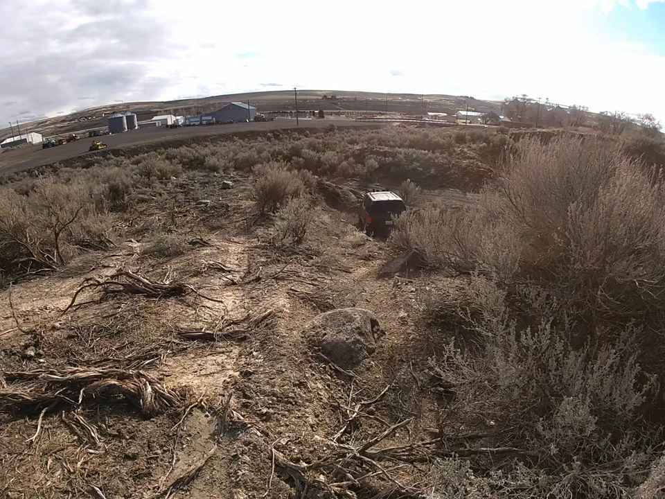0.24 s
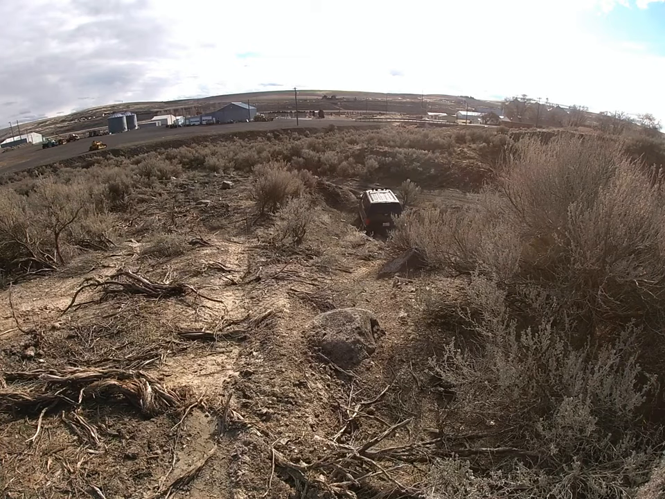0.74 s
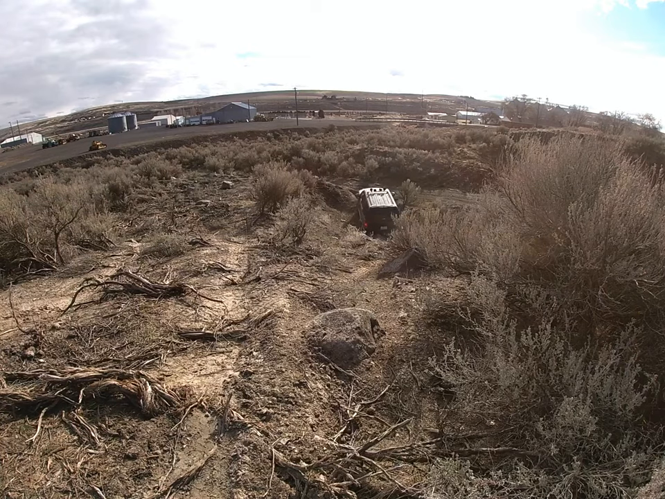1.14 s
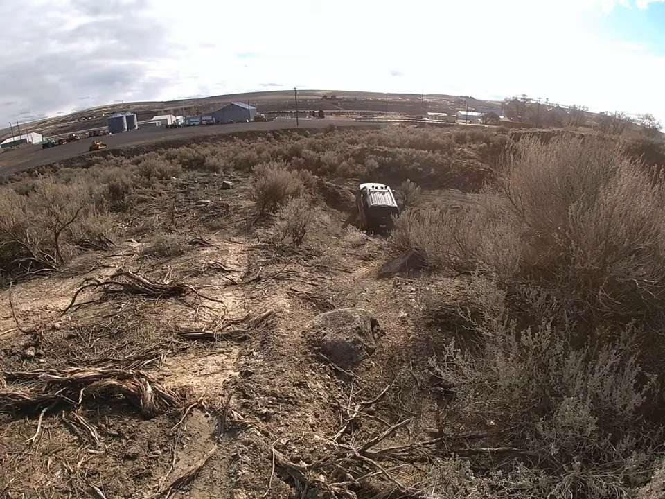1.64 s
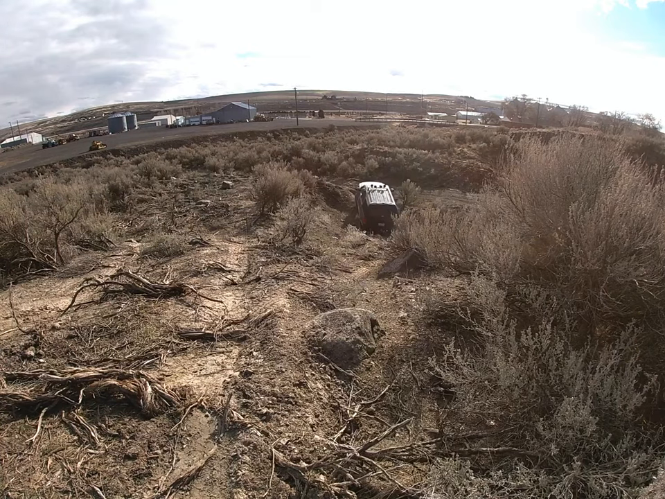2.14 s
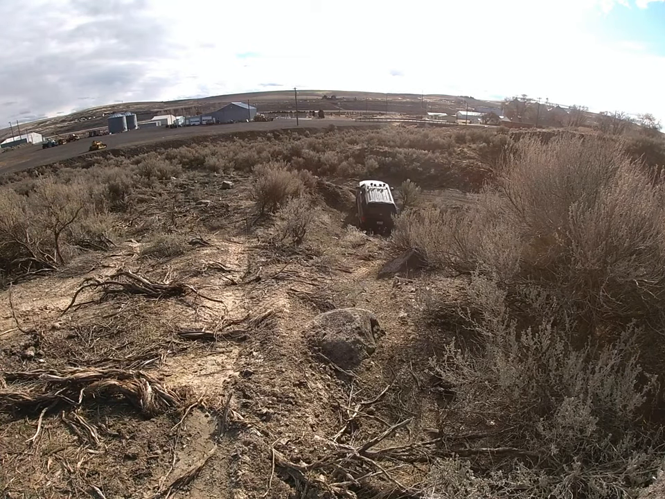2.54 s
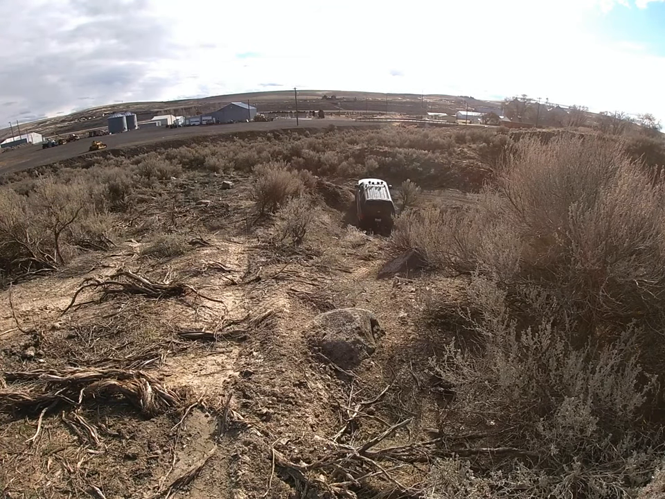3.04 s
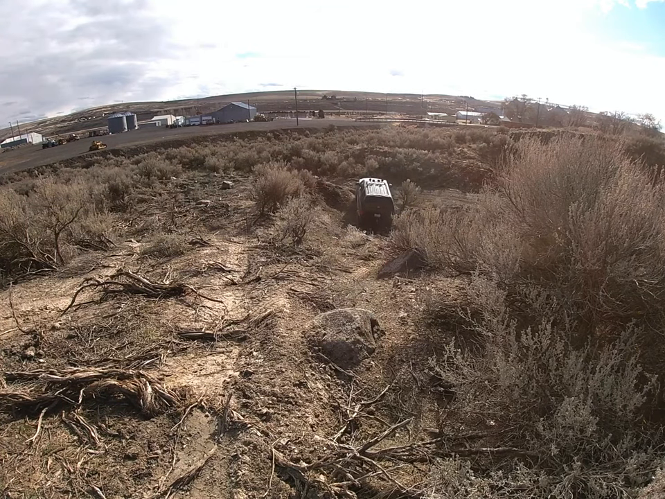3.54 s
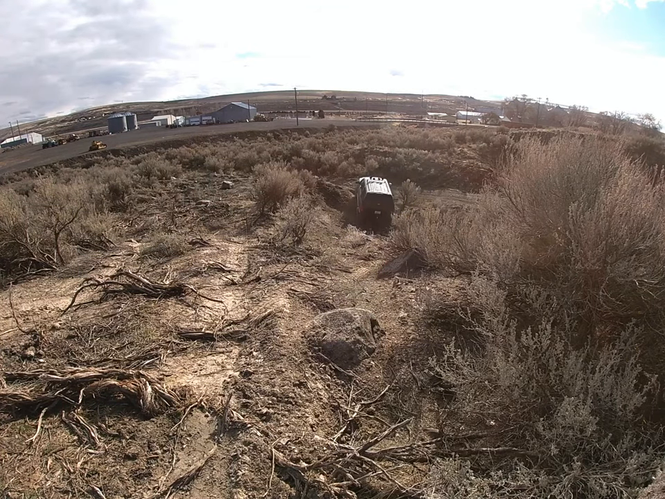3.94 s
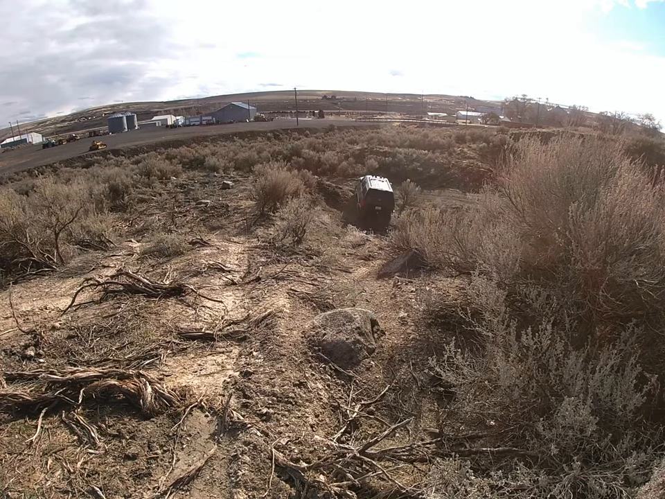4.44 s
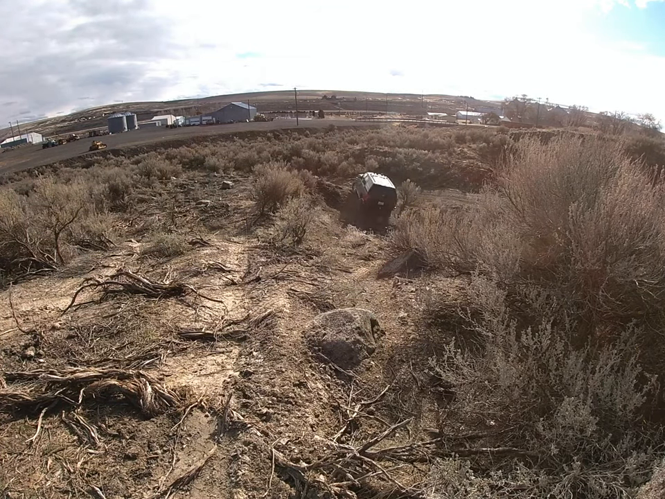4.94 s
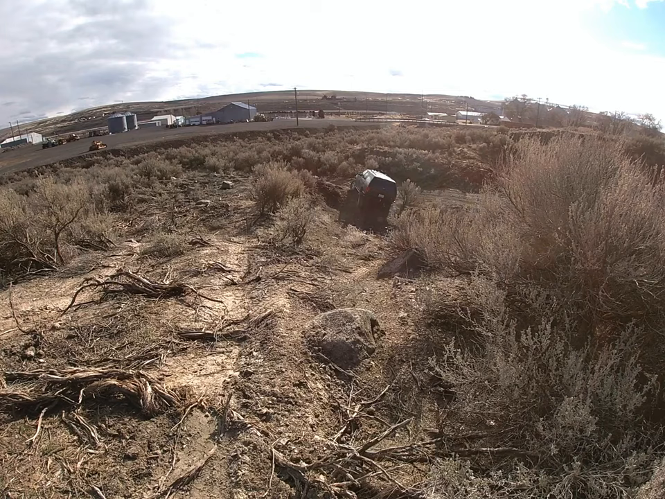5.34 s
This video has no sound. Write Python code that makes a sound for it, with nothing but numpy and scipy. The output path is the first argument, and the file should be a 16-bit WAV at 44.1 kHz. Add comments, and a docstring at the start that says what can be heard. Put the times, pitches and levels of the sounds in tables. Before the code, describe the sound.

A V8 off-roader crawls up a dirt gully in open scrub, heard from some way off with no echo. Its exhaust booms and lopes over a low rumble. On a first dab of throttle, tyres faintly crunch grit and twigs snap. Low thumps follow, like wind on the microphone, then two more dabs with a faint whine and small squeaks. It ends on a longer, steady pull at higher revs.

```python
"""A V8 off-roader crawls up a dirt gully in open scrub, some way off. From the start its exhaust booms
and lopes over a low rumble, with a faint high ticking throughout. On a first dab of throttle the tyres
crunch grit, dry brush scrapes, twigs snap and something squeaks. Low thumps and muffled buffets follow,
like wind on the microphone, and the drivetrain whines faintly through two more dabs. Last comes a long
steady pull, the engine bay opening up as the truck noses out of the gully."""
import sys
import numpy as np
from scipy import signal
from scipy.fft import rfft, irfft, next_fast_len
from scipy.io import wavfile
from scipy.ndimage import uniform_filter1d, map_coordinates

SR = 44100
rng = np.random.default_rng(int(sys.argv[2]) if len(sys.argv) > 2 else 0)


def generate_wav(signal):
    """Clip the signal to [-1, 1] and save it as 16-bit WAV at the path in sys.argv[1]."""
    frames = np.transpose(np.atleast_2d(signal))
    scaled = np.clip(frames, -1, 1) * 32767
    pcm = np.round(scaled).astype(np.int16)
    wavfile.write(sys.argv[1], SR, pcm)


N = 246078
FIRINGS = 8  # per engine cycle


def amp(db):
    """Decibels to gain."""
    return 10 ** (np.asarray(db) / 20)


def unit(x):
    """Scale to rms 1."""
    return x / np.sqrt(np.mean(x ** 2) + 1e-20)


def eq_gain(points, hz):
    """Gain at hz of an EQ curve drawn through (Hz, dB) points on a log axis."""
    point_hz, db = np.transpose(points)
    return amp(np.interp(np.log(hz + 1), np.log(point_hz + 1), db))


def automation(rows):
    """One value per sample, in straight ramps between (seconds, value) rows."""
    times, values = np.transpose(rows)
    return np.interp(np.arange(N) / SR, times, values)


def wobble(rate):
    """A smooth random curve, rate knots a second."""
    knots = rng.standard_normal(int(N * rate / SR) + 4)
    return map_coordinates(knots, [np.arange(N) * rate / SR])


def swells(rows, steady_db):
    """Gain of a steady bed with bell-shaped swells, from (centre s, half length s, dB) rows."""
    t = np.arange(N) / SR
    power = sum(amp(db) ** 2 * np.exp(-((t - s) / half) ** 2) for s, half, db in rows)
    return np.sqrt(amp(steady_db) ** 2 + power)


def filtered(x, response):
    """Filter x by a gain given as a function of Hz."""
    size = next_fast_len(len(x) + 8192)
    return irfft(rfft(x, size) * response(np.fft.rfftfreq(size, 1 / SR)), size)[:len(x)]


def coloured(x, eq):
    """x through an EQ curve, at rms 1."""
    return unit(filtered(x, lambda hz: eq_gain(eq, hz)))


def patchy(x, depth_db):
    """Let each narrow band of x swell and fade on its own."""
    bands = signal.stft(x, nperseg=1024)[2]
    drift = uniform_filter1d(rng.standard_normal(bands.shape), size=3, axis=0)
    drift = uniform_filter1d(drift, size=7, axis=1)
    return unit(signal.istft(bands * amp(depth_db * unit(drift)), nperseg=1024)[1][:len(x)])


def crackle(grains_per_s, spread_db, hiss, low_hz=700, top_hz=11500, grain_t60=0.003):
    """Dense tiny cracks of uneven size, each ringing briefly at its own pitch, on a soft hiss."""
    when, pitch, size = rng.random((int(grains_per_s * N / SR), 3)).T[:, :, None]
    n = np.arange(int(grain_t60 * SR))
    gains = amp(spread_db * np.minimum(-np.log(1 - size), 4))  # many small, a few large
    hz = low_hz + (top_hz - low_hz) * pitch
    grains = gains * amp(-60 * n / len(n)) * np.sin(2 * np.pi * hz * n / SR)
    positions = (when * N).astype(int) + n
    cracks = np.bincount(positions.ravel(), grains.ravel(), N)[:N]
    return unit(cracks) + hiss * rng.standard_normal(N)


def add(track, s, sound):
    """Mix a sound into the track from s seconds on."""
    part = track[max(round(s * SR), 0):][:len(sound)]
    part += sound[:len(part)]


def loping_tone(order, cycle, far_gain=0.6, far_late_cycles=0.05, weak_gain=0.5):
    """One exhaust harmonic, phased by banks taking unequal turns, a longer pipe and a weak cylinder."""
    far_bank = np.array([0, 1, 1, 0, 1, 0, 0, 1])  # firings that take the longer pipe
    pulses = np.where(far_bank, far_gain, 1.0)
    pulses[0] *= weak_gain
    arrivals = np.arange(FIRINGS) / FIRINGS + far_late_cycles * far_bank
    phase = np.angle(np.sum(pulses * np.exp(-2j * np.pi * order * arrivals)))
    return -np.sqrt(2) * np.cos(2 * np.pi * order * cycle + phase)


def exhaust(cycle, cycle_hz, boom_db=-0.2, weak_db=-2.3, weak_load=0.43, low_rev_db=-3, settle_hz=24):
    """Harmonics swell as the revs carry them across the pipe's resonances, and throb once a cycle."""
    # The strong harmonics, as multiples of the engine cycle.
    strong_orders = [5, 8, 11, 13, 16]
    # Their boom in the pipe. Each row: firings per second, then relative levels in dB for the
    # low lope, the firing note, the middle lope, the high lope and the firing octave.
    boom = [(51.8, -57.5, -42.5, -51, -27.5, -28), (57.9, -45.5, -34.5, -31, -40, -25),
            (59, -42, -32.5, -34.5, -43.5, -25.5), (67.6, -32.5, -30, -45.5, -47, -25),
            (72.56, -31, -23, -38, -59, -26), (76.3, -27.5, -19.5, -35, -38, -31),
            (83.9, -28, -21, -29.5, -25.5, -36), (90.8, -26.5, -21, -29, -27, -44)]
    # Weak harmonics from unequal cylinders. Each row: multiple of the cycle, relative level in dB.
    weak_orders = [(6, -41.5), (7, -27.5), (9, -43), (10, -34.5), (12, -35.5), (14, -30.5), (15, -42.5),
                   (17, -41.5), (18, -34.5), (19, -39.5), (20, -35.5), (21, -41), (22, -38.5), (23, -43.5),
                   (24, -37.5), (25, -43)]
    # Silencer and tailpipe EQ. Each row: frequency in Hz, gain in dB.
    pipe_eq = [(30, -13), (62, -10), (80, -2), (100, -4), (120, -10), (143, -3), (160, -4), (190, -12),
               (215, -10.5), (229, -8.5), (242, -30), (400, -31.5)]
    # Load drops at lift-off and jumps at the pick-up. Each row: time in seconds, gain in dB.
    load = [(0, 2.5), (.35, -3), (.75, -6.5), (1.15, -2.5), (1.33, -12.5), (1.97, -10), (2.03, 3.5),
            (2.5, -2.5), (2.92, 2), (3.3, -4.5), (3.72, 0.5), (4.3, 0.5), (5.58, -1.5)]
    load_db = automation(load)
    firing_hz = FIRINGS * cycle_hz
    # Combustion is uneven at low revs and settles as the engine speeds up.
    unsettled = np.exp((firing_hz.min() - firing_hz) / settle_hz)
    waver_db, rough_db, burble_db = 1.0, 2.5, 2.0
    speeds, *levels = np.transpose(boom)
    out = np.zeros(N)
    for order, db in zip(strong_orders, levels):
        level_db = np.interp(firing_hz, speeds, db) + load_db + boom_db
        out += amp(level_db + waver_db * unsettled * wobble(14)) * loping_tone(order, cycle)
    for order, db in weak_orders:
        level_db = db + weak_db + weak_load * load_db
        stumble_db = unsettled * (low_rev_db + rough_db * wobble(11))
        out += amp(level_db + stumble_db) * eq_gain(pipe_eq, order * cycle_hz) * loping_tone(order, cycle)
    return amp(burble_db * unsettled * wobble(20)) * out


def rasp(cycle, cycle_hz, rasp_db=-64, db_per_hz=2, octave_db=-9, rough_db=3, jitter_turns=0.085):
    """Rough high engine harmonics, fading by the octave and growing with the revs."""
    orders = np.arange(33, 54)
    out = np.zeros(N)
    for order in orders:
        turns = order * cycle + rng.random() + jitter_turns * wobble(12)
        level_db = octave_db * np.log2(order / orders[0]) + rough_db * rng.standard_normal()
        out += amp(level_db) * np.sin(2 * np.pi * turns)
    return amp(rasp_db + db_per_hz * (cycle_hz - cycle_hz.max())) * out


def engine_bay(cycle, cycle_hz, bay_db=-57.0, db_per_hz=0.84, throb_depth=0.12):
    """Fan and valve noise, louder with the revs and throbbing with each firing."""
    # A broad midrange rush. Each row: frequency in Hz, relative level in dB.
    bay_eq = [(300, -4.5), (550, 1), (800, 2), (1030, -1), (1300, 1), (1550, 0.5), (1800, -2), (2200, -5),
              (3000, -11), (4500, -21), (8500, -30), (10500, -47.5), (12000, -62)]
    # The bay opens up as the truck leaves the gully. Each row: time in seconds, gain in dB.
    opening = [(4.65, -5.5), (4.95, -2.5), (5.38, -1.5), (5.58, -3.5)]
    throb = 1 + throb_depth * np.cos(2 * np.pi * FIRINGS * cycle)
    rush = patchy(rng.standard_normal(N), depth_db=2.0)
    level_db = bay_db + db_per_hz * (cycle_hz - cycle_hz.mean()) + automation(opening)
    return amp(level_db) * coloured(throb * rush, bay_eq)


def rumble(roll_db=-35, shake_db=-55, lumps_db=0.5):
    """Low rumble and the body's shudder; both swell as the truck lurches over rough ground."""
    # Each row: centre in seconds, half length in seconds, rumble in dB, shudder in dB.
    lurches = [(0.306, 0.16, -37, -51), (0.677, 0.064, -28.5, -56), (1.44, 0.52, -37, -57.5),
               (1.814, 0.088, -25.5, -50.5), (2.24, 0.11, -27, -51.5), (2.622, 0.03, -29, -48.5),
               (2.784, 0.1, -34.5, -49), (3.046, 0.13, -30.5, -58), (3.255, 0.077, -24, -57),
               (3.83, 0.12, -29, -53), (5.498, 0.16, -45, -49.5)]
    # Deep rumble, low-mid shudder. Each row: frequency in Hz, relative level in dB.
    rumble_eq = [(10, -9), (24, 11.5), (40, 11.5), (62, 8), (85, 13.5), (120, 13), (165, 8), (205, 2.5),
                 (250, -12), (450, -64.5), (2000, -120)]
    shudder_eq = [(90, -15.5), (170, -3), (230, 2), (285, 4.5), (330, -1.5), (400, -10), (520, -14),
                  (700, -25), (1100, -37), (2500, -68.5), (6000, -120)]
    roll = swells([(s, half, db) for s, half, db, _ in lurches], roll_db)
    shake = swells([(s, half, db) for s, half, _, db in lurches], shake_db)
    low = coloured(rng.standard_normal(N), rumble_eq)
    lumps = amp(lumps_db * wobble(60))
    shudder = coloured(lumps * rng.standard_normal(N), shudder_eq)
    return roll * low + shake * shudder


def still_air(air_db=-67):
    """The steady hush of still air over the scrub."""
    # Each row: frequency in Hz, relative level in dB.
    air_eq = [(200, 4.5), (400, 2.5), (780, 8.5), (1100, -7), (2000, -10.5), (3800, -18), (7000, -18.5),
              (9800, -32), (12000, -54)]
    return amp(air_db) * coloured(rng.standard_normal(N), air_eq)


def ticking(tick_db=-69.0, per_s=27.0, scatter_s=0.0035, centre_hz=7400, sweep_hz=400, width_s=0.0014):
    """Faint, slightly fuzzy rising chirps, high up, at a nearly even pace."""
    out, t = np.zeros(N), np.arange(-SR // 200, SR // 200) / SR
    envelope = np.exp(-0.5 * (t / width_s) ** 2)
    for i, (late, size, pitch) in enumerate(rng.standard_normal((int(N / SR * per_s), 3))):
        hz = centre_hz * (1 + 0.025 * pitch) + sweep_hz * t / width_s
        fuzz = np.cumsum(0.34 * uniform_filter1d(rng.standard_normal(len(t)), size=12))
        chirp = envelope * np.sin(2 * np.pi * np.cumsum(hz) / SR + fuzz)
        add(out, i / per_s + scatter_s * late, amp(tick_db + 2 * size) * chirp)
    return out


def tyre_crunch(stones_db=-81.0, gravel_db=-79.5):
    """Tyres grind coarse stones and fine gravel, louder where they bite into a patch of grit."""
    # Each row: centre in seconds, half length in seconds, stones in dB, gravel in dB.
    patches = [(.12, 0.14, -76, -79), (1.02, .14, -69.5, -76), (1.09, 0.013, -65, -68),
               (1.15, .034, -64.5, -66.5), (1.37, 0.057, -76, -72.5), (2.42, 0.096, -73, -73.5),
               (2.68, 0.13, -72, -73.5), (2.89, 0.064, -71, -67.5), (3.02, 0.078, -68, -71),
               (3.22, 0.12, -75.5, -77.5), (4.07, 0.08, -74, -84), (4.32, .036, -67, -76.5),
               (4.82, .06, -64, -66.5), (4.925, 0.018, -62, -66.5), (5.0, 0.053, -67.5, -70),
               (5.275, 0.019, -65, -68.5), (5.4, 0.1, -67.5, -74.5)]
    # Darker stones, brighter gravel. Each row: frequency in Hz, relative level in dB.
    stones_eq = [(600, -16.5), (1800, 2.5), (3000, 6.5), (4200, -3), (6000, -15.5), (9000, -26.5),
                 (12500, -49.5)]
    gravel_eq = [(1500, -23.5), (3000, -10), (4200, 0), (5300, -1), (7000, -4), (8200, -10.5), (9500, -10),
                 (10500, -27), (12500, -47.5)]
    stones = coloured(crackle(grains_per_s=3000, spread_db=3.0, hiss=0.75), stones_eq)
    gravel = coloured(crackle(grains_per_s=3500, spread_db=3.0, hiss=0.75), gravel_eq)
    stones *= swells([(s, half, db) for s, half, db, _ in patches], stones_db)
    gravel *= swells([(s, half, db) for s, half, _, db in patches], gravel_db)
    return stones + gravel


def brush_scrape(rustle_db=-91):
    """Dry stems sweep along the body with a fine, bright scrape."""
    # Each row: centre in seconds, half length in seconds, level in dB.
    sweeps = [(.2, 0.07, -80), (.92, 0.099, -72.5), (1.11, 0.098, -72), (1.27, 0.027, -74.5),
              (3.11, 0.011, -73), (3.345, 0.019, -70), (4.84, 0.087, -74.5), (5.07, 0.011, -71)]
    # The bristly top end. Each row: frequency in Hz, relative level in dB.
    stems_eq = [(3000, -24.5), (6000, -5), (7400, 0.5), (8200, -9.5), (9000, 2), (9800, 0.5),
                (10600, -12.5), (12500, -21.5)]
    stems = coloured(crackle(grains_per_s=3000, spread_db=3.7, hiss=0.55), stems_eq)
    return swells(sweeps, rustle_db) * stems


def snaps(tail_t60=0.031):
    """Each snap is one crack with a brief splintering tail: thin twigs bright, stones dull."""
    # Each row: start in seconds, peak in dB, low cut in Hz, high cut in Hz, tail in dB re the crack.
    breaks = [(0.158, -51, 3000, 7100, -22), (0.99, -48, 3500, 9600, -18), (1.086, -44, 1800, 9500, -21),
              (1.132, -46, 4000, 12400, -18), (1.142, -46, 3000, 9000, -15),
              (1.155, -43, 2500, 9000, -18.5), (1.264, -48, 4000, 10000, -21),
              (1.362, -52, 3030, 6070, -17), (2.5067, -37.5, 4500, 8700, -29),
              (2.616, -51, 2500, 6000, -20), (2.777, -49.5, 1210, 4000, -18.5),
              (3.092, -46, 4500, 10000, -23), (3.188, -47, 4450, 8100, -25), (3.215, -44, 1500, 4600, -23),
              (3.328, -50, 4500, 10100, -26), (3.3537, -40, 4400, 6500, -34),
              (3.360, -35.5, 4400, 6900, -30), (3.364, -46.5, 990, 2980, -14),
              (4.087, -46, 2540, 5500, -21), (4.733, -48, 1800, 8000, -15), (4.822, -52, 2500, 6500, -4),
              (4.842, -48, 3000, 9000, -6), (4.908, -46, 2000, 5960, 0), (4.943, -47.5, 2000, 4960, -5.5),
              (5.074, -52.5, 5030, 10000, -19.5), (5.392, -36.5, 900, 3900, -22.5)]
    out, t = np.zeros(N), np.arange(SR // 16) / SR
    lead = SR // 200  # room for the filter to ring ahead of the crack
    for s, db, low_hz, top_hz, tail_db in breaks:
        burst = (t == 0) + amp(tail_db - 60 * t / tail_t60) * rng.standard_normal(len(t))
        band = lambda hz: 1 / (1 + (low_hz / (hz + 1)) ** 5) / (1 + (hz / top_hz) ** 8)
        crack = filtered(np.pad(burst, (lead, 0)), band)
        add(out, s - lead / SR, amp(db) * crack / np.abs(crack).max())
    return out


def squeaks():
    """Brief wavering squeaks as something rubs."""
    # Each row: centre in seconds, peak in dB, pitch in Hz, width in seconds, waver as a share of pitch.
    rubs = [(0.24, -69, 4950, 0.0096, .06), (0.238, -78, 2610, .0096, 0.055),
            (1.70, -71, 5080, 0.012, 0.05), (1.70, -71, 2800, 0.012, .06),
            (2.08, -63.5, 1700, 0.013, 0.021), (2.64, -61, 1620, 0.013, 0.024),
            (2.78, -63, 1590, .012, 0.032), (3.016, -61, 1458, 0.014, .012),
            (3.24, -61.5, 1460, 0.011, 0.024), (3.884, -62, 1167, 0.022, 0.019),
            (4.306, -68, 5160, 0.0064, 0.0088), (4.31, -55.5, 3120, 0.0064, 0.0092)]
    out, t = np.zeros(N), np.arange(N) / SR
    for s, db, hz, width, waver in rubs:
        turns = np.cumsum(hz * (1 + waver * wobble(500))) / SR
        envelope = np.exp(-0.5 * ((t - s) / width) ** 2)
        out += amp(db) * envelope * np.sin(2 * np.pi * turns)
    return out


def muffled_buffets(rise_s=0.0022, low_hz=210):
    """Flurries of gruff, muffled knocks, like wind gusts on the microphone."""
    # Each row: start in seconds, peak in dB, high cut in Hz, seconds to die away by 60 dB.
    buffets = [(1.652, -37.5, 340, .035), (1.699, -39, 400, 0.025), (1.723, -35, 280, 0.083),
               (1.746, -25.5, 300, 0.027), (1.761, -39, 330, .05), (1.812, -34, 320, 0.033),
               (1.826, -30.5, 470, 0.068), (1.863, -39, 360, 0.11), (2.173, -39, 440, .06),
               (2.248, -34, 400, .055), (2.28, -37, 400, .045), (2.343, -36, 280, .06),
               (2.465, -43, 290, 0.055), (2.586, -42, 460, 0.023), (2.601, -36.5, 340, 0.058),
               (2.702, -36.5, 390, .035), (2.732, -34.5, 420, 0.1), (2.791, -44, 500, 0.027),
               (2.815, -33.5, 290, 0.038), (2.843, -38, 450, 0.043), (2.862, -34.5, 290, 0.034),
               (5.393, -38, 320, 0.019)]
    out, t = np.zeros(N), np.arange(SR // 6) / SR
    for s, db, top_hz, t60 in buffets:
        band = lambda hz: 1 / (1 + (low_hz / (hz + 1)) ** 4) / (1 + (hz / top_hz) ** 6) / (1 + hz / low_hz)
        envelope = amp(-60 * t / t60) * (1 - np.exp(-t / rise_s))
        knock = envelope * filtered(rng.standard_normal(len(t)), band)
        add(out, s, amp(db) * knock / np.abs(knock).max())
    return out


def low_thumps(rise_s=0.004):
    """Deep, heavily damped thumps with a soft attack, like wind buffeting the microphone."""
    # Each row: start in seconds, peak in dB, pitch in Hz, seconds to die away by 60 dB.
    thumps = [(1.655, -35.5, 166, .05), (1.744, -12.5, 103, 0.018), (1.767, -19, 116, 0.035),
              (1.79, -13.5, 50, .055), (1.804, -19, 121, 0.12), (1.826, -26, 127, .08),
              (2.185, -28.5, 185.5, 0.1), (2.696, -28.5, 161, .045), (2.839, -36, 286, 0.093),
              (5.394, -25.5, 213, 0.017)]
    out, t = np.zeros(N), np.arange(SR // 4) / SR
    for s, db, hz, t60 in thumps:
        envelope = amp(-60 * t / t60) * (1 - np.exp(-t / rise_s))
        thump = -envelope * np.sin(2 * np.pi * hz * t)
        add(out, s, amp(db) * thump / np.abs(thump).max())
    return out


def whine(start_s=1.95, end_s=4.0, fade_s=0.083, whine_db=-75.0, waver=0.013, flutter_db=4):
    """A faint unsteady two-note whine from the drivetrain while the truck strains."""
    # The two pitches in Hz.
    notes = [1444, 1615]
    out, t = np.zeros(N), np.arange(N) / SR
    for hz in notes:
        turns = np.cumsum(hz * (1 + waver * wobble(90))) / SR
        out += amp(whine_db + flutter_db * wobble(25)) * np.sin(2 * np.pi * turns)
    fade = np.clip(np.minimum(t - start_s, end_s - t) / fade_s, 0, 1)
    return fade * out


def scene():
    """A mono mix with no echo on open ground; the revs drive exhaust, rasp and engine bay."""
    # The throttle moves. Each row: time in seconds, firings per second.
    revs = [(0.0, 52.1), (0.3, 62.8), (0.5, 65.7), (1.15, 62.9), (1.96, 49.6), (2.26, 69.7), (2.47, 71.0),
            (2.83, 61.1), (3.16, 77.1), (3.28, 74.5), (3.61, 63.1), (4.03, 80.5), (4.19, 84.7),
            (4.58, 82.7), (4.94, 91.6), (5.24, 91.5), (5.58, 87.6)]
    cycle_hz = automation(revs) / FIRINGS
    cycle = 0.73 + np.cumsum(cycle_hz) / SR  # starts partway through a cycle
    engine = exhaust(cycle, cycle_hz) + rasp(cycle, cycle_hz) + engine_bay(cycle, cycle_hz) + whine()
    low_end = rumble() + low_thumps() + muffled_buffets()
    crunch = tyre_crunch() + brush_scrape()
    clumps = amp(1.43 * wobble(70))  # grit and brush flicker together
    trail = clumps * crunch + snaps() + squeaks()
    return (engine + low_end + trail + ticking() + still_air())[None]


def record(dry, top_hz=12700):
    """A steep high cut takes off the very top of the mix."""
    return np.array([filtered(x, lambda hz: 1 / (1 + (hz / top_hz) ** 60)) for x in dry])


dry = scene()
out = record(dry)
generate_wav(out)
```